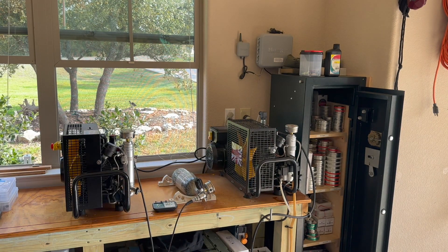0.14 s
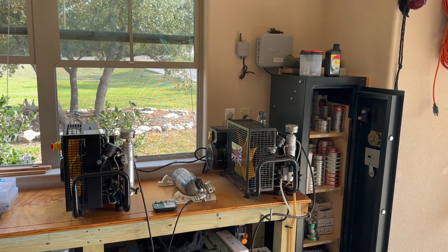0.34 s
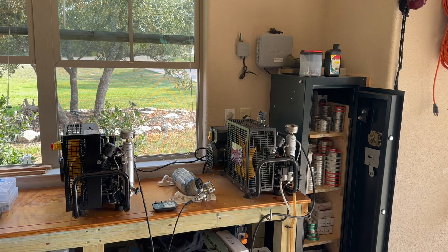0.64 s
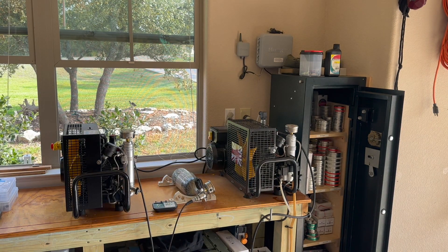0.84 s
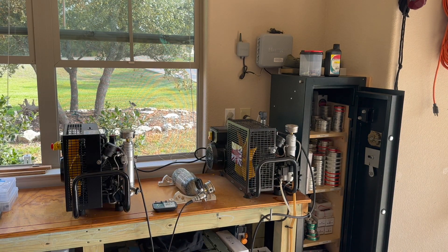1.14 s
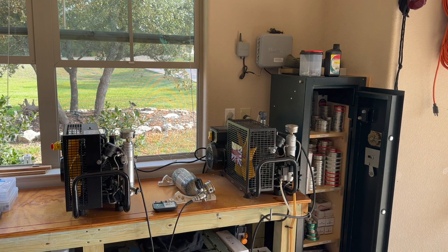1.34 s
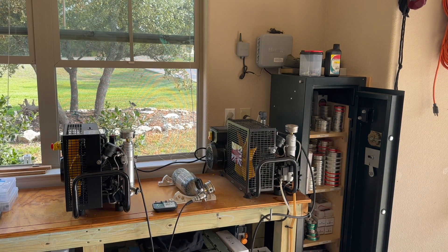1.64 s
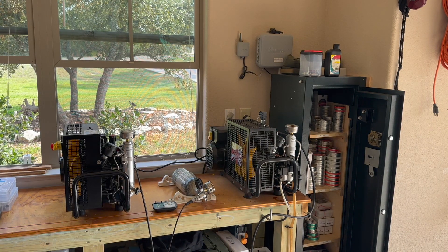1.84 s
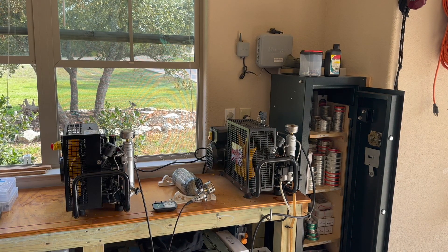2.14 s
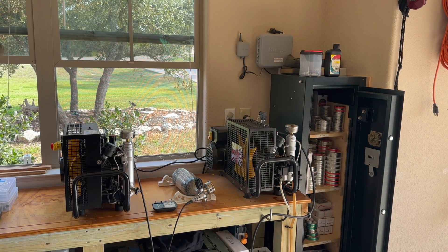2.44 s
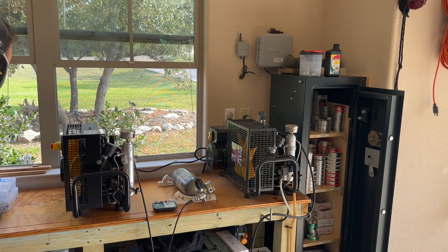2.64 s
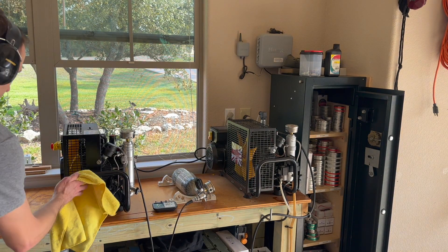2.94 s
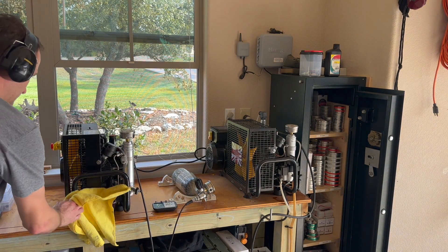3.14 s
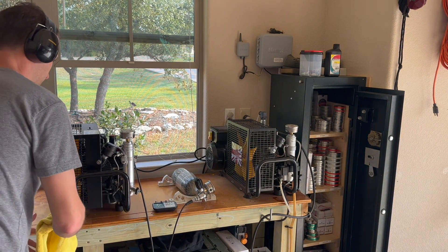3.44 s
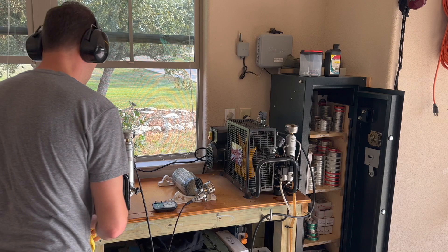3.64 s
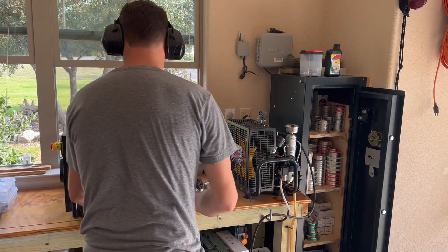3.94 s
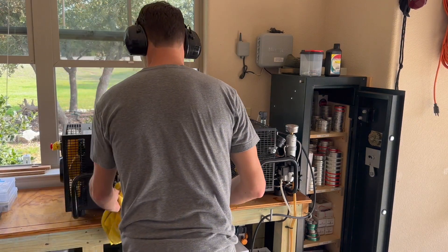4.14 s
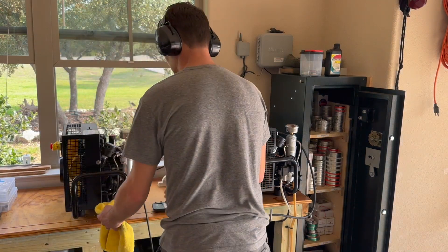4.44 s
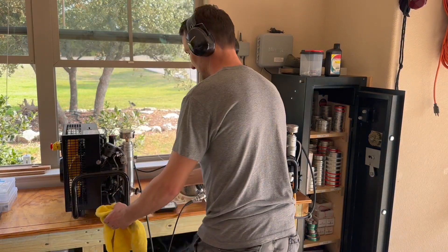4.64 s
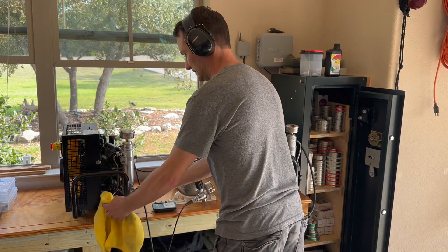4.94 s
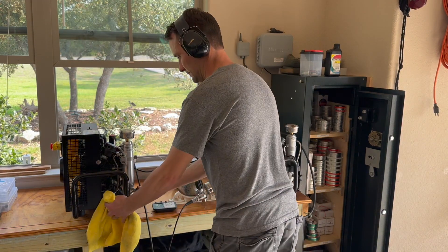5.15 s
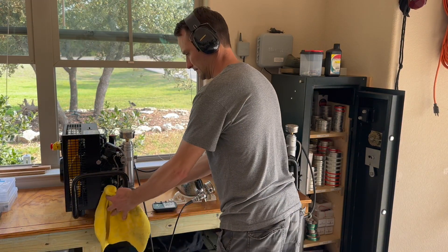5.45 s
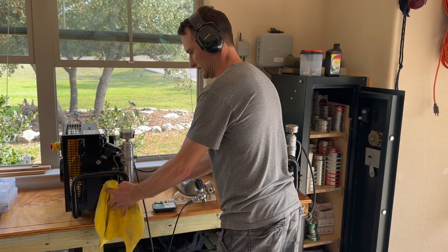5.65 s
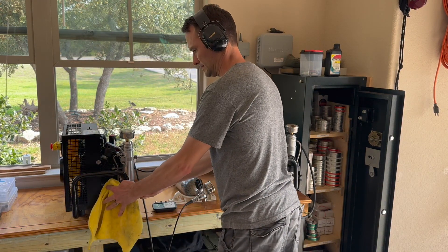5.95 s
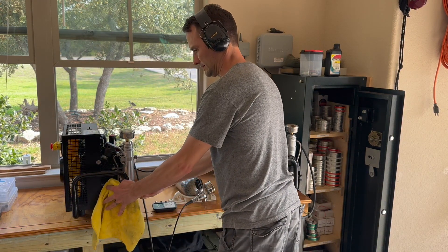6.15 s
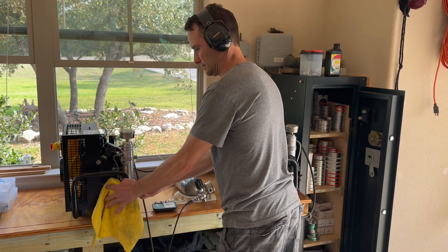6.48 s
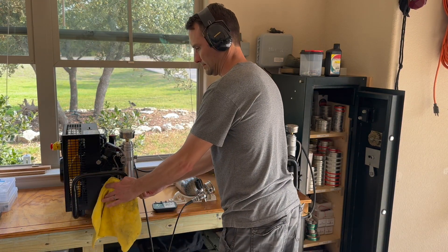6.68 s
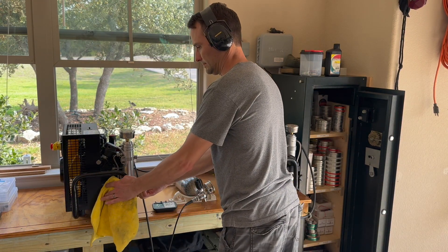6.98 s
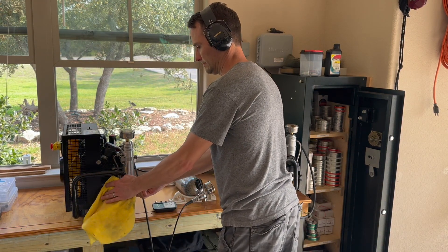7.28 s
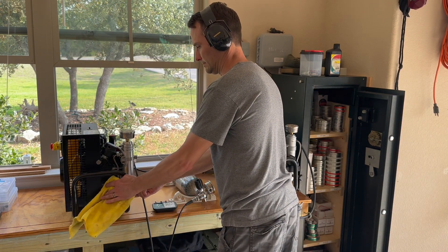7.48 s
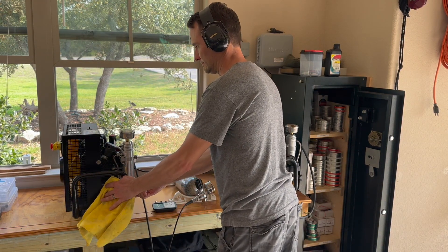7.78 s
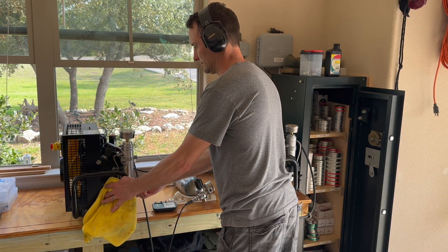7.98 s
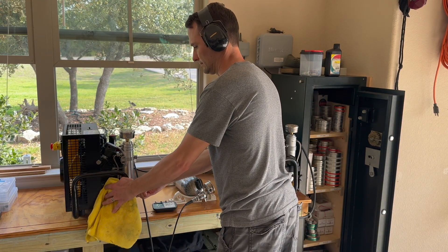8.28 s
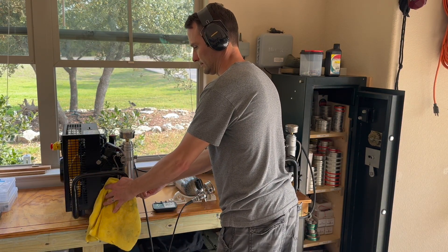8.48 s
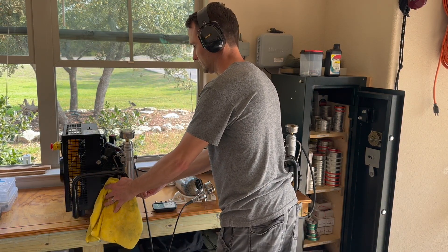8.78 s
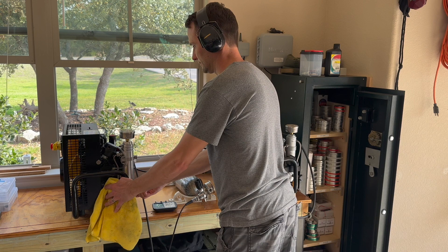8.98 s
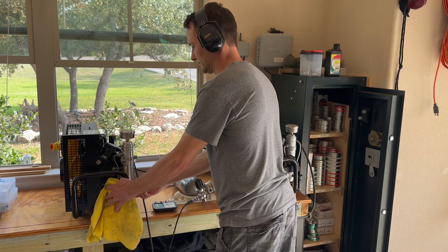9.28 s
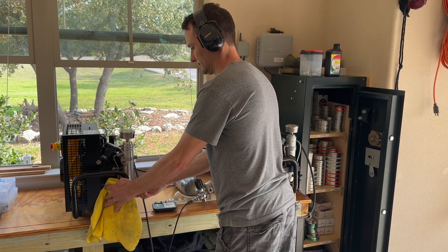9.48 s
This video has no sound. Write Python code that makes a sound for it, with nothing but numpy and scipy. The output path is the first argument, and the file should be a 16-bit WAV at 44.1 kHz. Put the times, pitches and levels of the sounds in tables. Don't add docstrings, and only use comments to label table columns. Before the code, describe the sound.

From the start a loud jet of compressed air hisses without pause, bright and sizzling, strongest in the high treble, with a ragged fixed metallic colour and small quick wavering. A faint low building rumble lies underneath. Soft footfall-like knocks come at 0.6-0.8 s, 2.3 s and 2.8 s. At about 4.0 s a passing body dulls the hiss briefly; a small footfall follows, then a crisp rag slap at 4.45 s and a lighter knock at 4.75 s. The hiss dips a little around 5.0 and 5.5 s. From 5.7 s cloth closes over the jet, changing its tone, with swelling puffs from 6.1 s. At 7.4 s a loud slap and raspy flapping roar burst out, and a second roar comes at 7.7 s. Tighter, sharper hiss continues; another roar swells to 8.9 s and cuts off abruptly. A last short flap snaps near 9.6 s. Close, small workshop, short reverberation.

```python
import sys
import numpy as np
from scipy import signal
from scipy.fft import rfft, irfft
from scipy.io import wavfile
from scipy.ndimage import uniform_filter1d

SR = 44100
rng = np.random.default_rng(int(sys.argv[2]) if len(sys.argv) > 2 else 0)


def materialize(psi):
    bounded = np.clip(np.atleast_2d(psi).T, -1, 1)
    quanta = np.round(bounded * 32767).astype(np.int16)
    wavfile.write(sys.argv[1], SR, quanta)


def gain_from_db(level_db):
    decades = np.asarray(level_db, float) / 20
    return 10 ** decades


N = 424241
HZ = np.fft.rfftfreq(N, 1 / SR)
TIME = np.arange(N) / SR
FREE_JET, IN_RAG = 2, 3

# time in seconds, share from 0 to 1.
CAUGHT = [
    (0, 0.41),
    (3.7, 0),
    (4.2, 0.3),
    (4.7, 0.02),
    (5.5, 0),
    (5.7, 0.96),
    (7.0, 1),
    (9.62, 0.93),
]
# time in seconds, tightness from 0 to 1.
TIGHT = [
    (0, 0.4),
    (5.9, 0.06),
    (6.5, 0.18),
    (6.8, 0.32),
    (7.3, 0.45),
    (7.7, 0.88),
    (9.0, 0.9),
    (9.62, .8),
]


def curves(table):
    seconds, *columns = np.transpose(table)
    return [np.interp(TIME, seconds, column) for column in columns]


def bumps(table):
    return sum(db * np.exp(-((TIME - s) / width) ** 2) for s, db, width in table)


def walk(rate):
    hold = int(SR / rate)
    steps = np.repeat(rng.standard_normal(N // hold + 1), hold)
    return 0.92 * uniform_filter1d(uniform_filter1d(steps, hold), hold)[:N]


def colour(table):
    hz, db = np.transpose(table)
    below = np.minimum(HZ / hz[0], 1) ** 2
    return gain_from_db(np.interp(np.log(HZ + 1), np.log(hz), db)) * below


def whistling(table, column):
    # frequency in Hz, width in Hz, boost in dB of the free jet, boost in dB of the jet in the rag.
    resonances = [(297, 29, 5, 3.5), (586, 76, 15.5, 3.5), (1180, 140, -2, 2.5), (3000, 180, -3.5, -2),
                  (2630, 86, -2, 1), (1532, 120, 0, -5.5), (1910, 35, 3.5, 0.5), (2537, 95, 5.5, 4.5),
                  (3130, 25, 7, 4.5), (3342, 36, 6.5, 5), (3607, 22, -14, 4), (3882, 49, 8, 4.5),
                  (4170, 59, -3, 5.5), (4588, 47, 7.5, 2), (4644, 47, 7, 3), (4780, 62, 1, 0.5),
                  (5230, 40, -3, -2), (5380, 25, -11, 0), (5680, 33, 2, 8), (5700, 27, -1.5, -20),
                  (6490, 54, 5.5, -4), (6870, 27, 6.5, 3), (8240, 120, 1, 6.5), (8470, 41, 8.5, 5),
                  (12075, 100, 8.5, 14), (12810, 60, 9.5, -11), (12980, 90, -1, 5), (13600, 100, -1, 1),
                  (14300, 95, 6.5, 4), (15600, 82, -2, -11)]
    boost_db = sum(row[column] / (1 + (2 * (HZ - row[0]) / row[1]) ** 2) for row in resonances)
    return colour(table) * gain_from_db(boost_db)


def room():
    t60_s, reflected_db = 0.2, -8
    tail = rng.standard_normal(SR) * np.exp(-np.log(1000) * TIME[:SR] / t60_s)
    tail[:int(.002 * SR)] = 0
    return 1 + gain_from_db(reflected_db) * rfft(tail / np.sqrt(np.sum(tail ** 2)), N)


def ports(shared, other, column=FREE_JET):
    # frequency in Hz, likeness from 0 to 1,
    # right minus left in dB, lead of the right port in half turns.
    low = [(60, 0.96, 1, -0.01), (302, 0.88, -1, 0.06), (720, 0.79, -0.5, -0.4), (955, 0.14, -1.5, 0.06),
           (1840, 0.59, 1, -0.2), (2810, 0, -0.5, -0.32), (3370, 0.58, -5, -0.57),
           (8460, 0.25, -5.5, -0.16)]
    # frequency in Hz, likeness from 0 to 1,
    # lead in half turns of the free jet, lead in half turns of the jet in the rag.
    treble = [(8150, .9, .04, .04), (9300, .95, .22, .22), (10550, 1, .94, .93), (11700, 1, 1.05, 1.03),
              (12100, 1, 1.27, 1.14), (12600, 1, 1.4, 1.25), (13400, 1, 1.7, 1.7), (13850, 1, 1.97, 1.97),
              (14900, 1, 2.04, 2.04), (15600, 1, 2.36, 2.36)]
    rows = list(low) + [(row[0], row[1], 0, row[column]) for row in treble]
    hz, like, db, turns = np.transpose(rows)
    like = np.clip(np.interp(HZ, hz, like), 0, 1)
    turned = like * np.exp(1j * np.pi * np.interp(HZ, hz, turns)) * shared
    right = gain_from_db(np.interp(HZ, hz, db)) * (turned + np.sqrt(1 - like ** 2) * other)
    return np.array([shared, right])


def turbulence(gain, column=FREE_JET):
    near, far = rfft(rng.standard_normal((2, N)))
    late = np.exp(-2j * np.pi * HZ * .006)
    left_path = room() * near
    other_path = room() * (0.63 * late * near + 0.79 * far)
    return gain * ports(left_path, other_path, column)


def unit(spectra):
    x = irfft(spectra, N)
    return x / np.sqrt(np.mean(x ** 2))


def shop():
    # frequency in Hz, level in dB.
    rumble = [(13, -41), (22, -25), (71, 2.5), (152, -7.5), (226, -6.5), (285, 1), (350, -15), (400, 2.5),
              (520, -23), (880, -120)]
    # time in seconds, gain in dB.
    duck = [(0, 1), (6.5, -0.5), (7.2, -1), (7.9, 5), (8.2, -4), (8.7, -5), (9.0, -2.5), (9.62, -5)]
    level_db = -52 + curves(duck)[0] + 0.44 * walk(1.67)
    return gain_from_db(level_db) * unit(turbulence(colour(rumble)))


def knocks():
    # start in seconds, peak in dB, centre in Hz, t60 in seconds.
    impacts = [(.609, -34.5, 200, .22), (.62, -33, 900, .04), (.76, -34, 450, .1), (.8, -40, 95, .16),
               (2.28, -35.5, 390, .16), (2.799, -38, 160, .2), (4.11, -37, 180, .15),
               (4.454, -19, 2500, .02), (4.455, -31.5, 600, .03), (4.482, -39, 150, .2),
               (4.752, -30, 660, .08), (4.79, -38, 300, .07), (7.36, -29, 190, .065),
               (7.385, -11, 1800, .04), (7.455, -13, 6000, .015), (7.98, -36, 150, .12)]
    out, size = np.zeros(N), SR // 2
    for s, db, hz, t60 in impacts:
        burst = rng.standard_normal(size) * np.exp(-np.log(1000) * TIME[:size] / t60)
        resonance = signal.butter(1, [hz / 1.64, hz * 1.1], "band", fs=SR, output="sos")
        burst = signal.sosfilt(resonance, burst)
        start = int(s * SR)
        out[start:start + size] += gain_from_db(db) * burst / np.abs(burst).max()
    sound = rfft(out)
    return irfft(ports(room() * sound, room() * sound), N)


def rag():
    # frequency in Hz, level in dB.
    roar_colour = [(35, -45), (60, -19), (289, -5.5), (617, -0.5), (794, 0.5), (902, 0), (2000, -2.5),
                   (4500, -14.5), (5850, -39), (9900, -120)]
    # time in seconds, peak in dB, swell in dB/s, collapse in dB/s.
    billows = [
        (2.15, -48, 6, 20),
        (2.81, -50, 20, 8),
        (4.18, -46, 30, 60),
        (5.12, -49, 30, 3),
        (6.71, -43, 30, 8),
        (7.41, -28, 42, 32),
        (7.72, -36.5, 60, 17),
        (8.93, -32.5, 22, 400),
        (9.03, -45, 100, 14),
        (9.57, -36, 400, 200),
    ]
    caught, tight = curves(CAUGHT)[0], curves(TIGHT)[0]
    fill = gain_from_db(-52.5 + 0.5 * tight) ** 2
    for s, db, swell, collapse in billows:
        fall_db = np.where(TIME < s, swell * (s - TIME), collapse * (TIME - s))
        fill = fill + gain_from_db(db - fall_db) ** 2

    calm_db = -34.5
    excess_db = np.maximum(10 * np.log10(fill) - calm_db, 0)
    deep_db = 0.7 + 8.5 * caught - 13 * tight
    rasp_db = 3 - 6.5 * caught + 8 * tight + 0.71 * excess_db

    roar = turbulence(whistling(roar_colour, IN_RAG))
    deep = 1 / (1 + (HZ / 380) ** 4)
    rasp = 1 / (1 + (1500 / (HZ + 1)) ** 4)
    parts = irfft(roar * (1 - deep - rasp), N)
    parts = parts + gain_from_db(deep_db) * irfft(roar * deep, N)
    parts = parts + gain_from_db(rasp_db) * irfft(roar * rasp, N)
    flap_db = 5.5 + 0.66 * walk(14) + 0.3 * walk(40)
    return np.sqrt(fill) * gain_from_db(flap_db) * parts / np.std(irfft(roar, N))


def jet():
    # frequency in Hz, level in dB.
    free_colour = [(1200, -20.1), (1900, -14.7), (2400, -12.9), (3200, -5.6), (4600, -4.5), (7800, -8.2),
                   (8600, -6.9), (9600, -8.6), (11400, -8.1), (12100, -3.2), (13000, 0.0), (14000, -6.0),
                   (15000, -5.9), (15600, -2.5)]
    muffled_colour = [(1200, -18.2), (1900, -12.9), (2400, -9.2), (3200, -1.3), (4600, -3.5), (7800, -3.7),
                      (8600, -5.4), (9600, -7.6), (11400, -9.6), (12100, -9.5), (13000, -4.2),
                      (14000, -5.2), (15000, -2.4), (15600, 0.0)]
    split_hz = (4750, 8240, 12580)
    # free level in dB, gain in the rag in dB, gain when tight in dB,
    # share of a shadow felt, gain when aimed at the phone in dB.
    eddies = [
        (-27.5, 3, -6.5, .4, 0),
        (-28, 2, 1.5, 0.86, -1.5),
        (-27, 0, 4, 0.84, -1.5),
        (-18.5, 3.5, 1, 1.04, 2),
    ]
    # time in seconds, flow in dB, aim from -1 (away) to +1 (at the phone).
    flow = [(0, -.5, 0), (.5, 0, -0.078), (.8, .5, -0.05), (1.05, 0, -0.14), (1.6, .5, 0.071),
            (2.3, 1.5, -0.11), (3.05, -1, 0.085), (3.45, 0, 0.27), (4.3, -1, -0.16), (4.7, 1, .4),
            (5.4, -1.5, 0.56), (5.75, 0, 0.49), (6.6, 1, -0.38), (7.0, 1.5, -0.79), (7.45, 0, -0.52),
            (8.6, 0, .3), (9.2, .5, -0.6), (9.62, 1.5, -0.25)]
    # time in seconds, loss in dB, half width in seconds.
    shadows = [(.99, 2, .04), (1.8, 1, .08), (4.04, 7, 0.12), (4.47, 0, .04), (5.0, 3, 0.15),
               (5.22, 2, .04), (5.48, 3.5, 0.069), (6.34, 2, 0.098), (6.77, 1, .03), (7.03, 1.5, 0.064),
               (8.58, 1, .06), (8.95, 4, 0.051), (9.44, 0.5, .1), (9.62, 6, 0.016)]
    # time in seconds, gain in dB, half width in seconds.
    puffs = [(2.58, 1.5, .03), (3.12, 0.5, .04), (4.71, 0, .05), (6.1, 1.5, 0.095), (6.69, 3, 0.067),
             (7.15, 2.5, 0.058), (7.48, 3.5, 0.079), (7.77, 1.5, .04), (8.7, 1.5, 0.044), (8.88, 2, .04),
             (9.575, 0.5, .02)]
    caught, tight = curves(CAUGHT)[0], curves(TIGHT)[0]
    free = turbulence(whistling(free_colour, FREE_JET), FREE_JET)
    muffled = turbulence(whistling(muffled_colour, IN_RAG), IN_RAG)

    steps = [1 / (1 + np.exp(np.clip((hz - HZ) / 250, -40, 40))) for hz in split_hz]
    above = [1] + steps + [0]
    flow_db, aim = curves(flow)
    flutter_db = flow_db + 0.5 * walk(17) + 0.37 * walk(35)
    exposed_db = bumps(puffs) - bumps(shadows)
    out = 0
    for k, (free_db, caught_db, tight_db, felt, aimed_db) in enumerate(eddies):
        band = above[k] - above[k + 1]
        mix = np.sqrt(1 - caught) * unit(band * free) + np.sqrt(caught) * unit(band * muffled)
        db = free_db + caught_db * caught + tight_db * tight + felt * exposed_db + aimed_db * aim
        flicker_db = 0.41 * walk(12) + 0.6 * walk(22)
        out = out + gain_from_db(db + flutter_db + flicker_db) * mix
    return out


def scene():
    return shop() + knocks() + rag() + jet()


def low_pass(x):
    return signal.sosfilt(signal.butter(12, 16870, fs=SR, output="sos"), x)


def record(dry):
    top_hz = 15740
    clipped = np.clip(dry, -1, 1)
    mix = irfft(rfft(clipped) * (HZ < top_hz), N)
    return low_pass(mix)


dry = scene()
out = record(dry)
materialize(out)
```